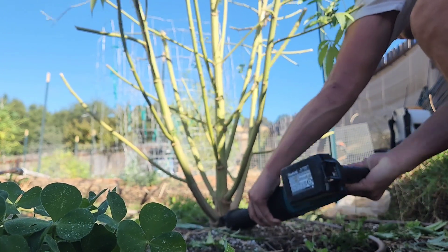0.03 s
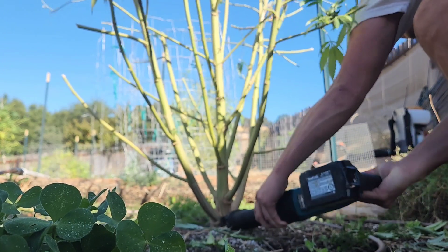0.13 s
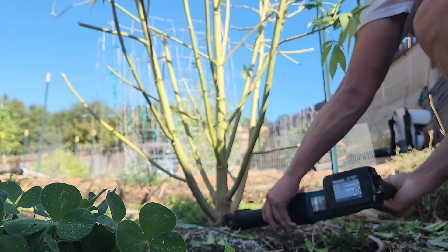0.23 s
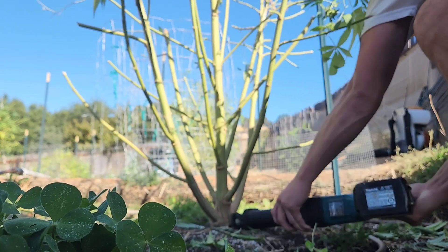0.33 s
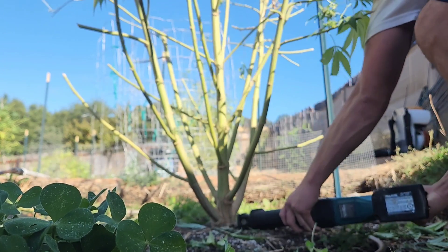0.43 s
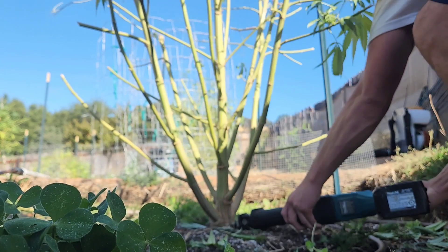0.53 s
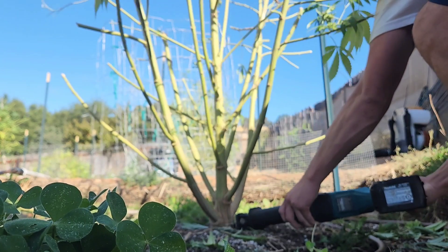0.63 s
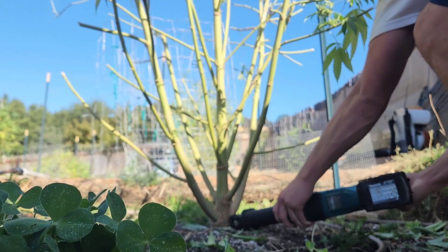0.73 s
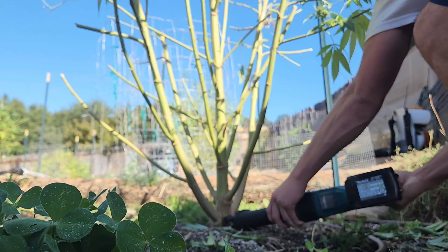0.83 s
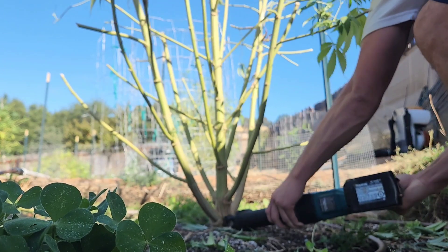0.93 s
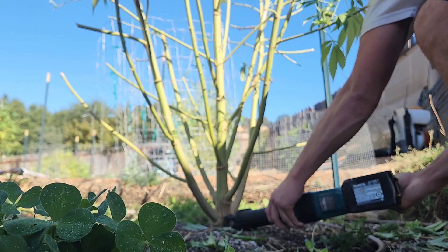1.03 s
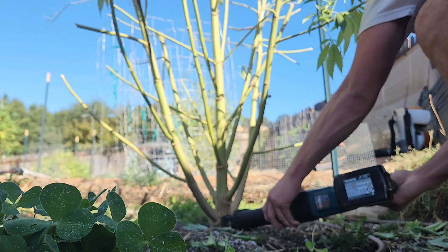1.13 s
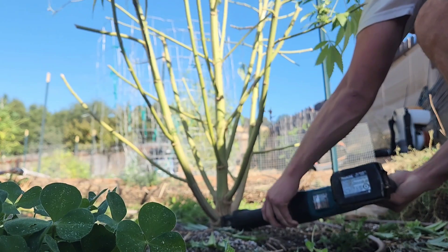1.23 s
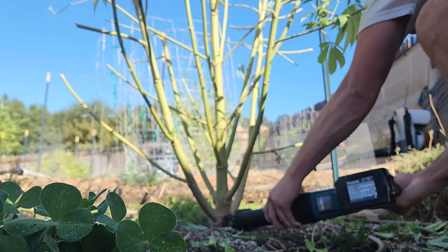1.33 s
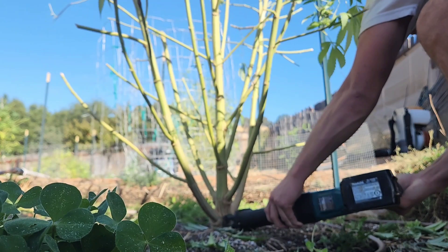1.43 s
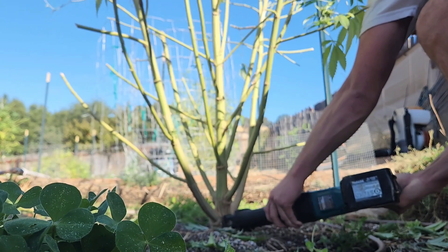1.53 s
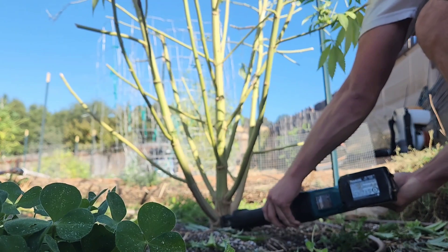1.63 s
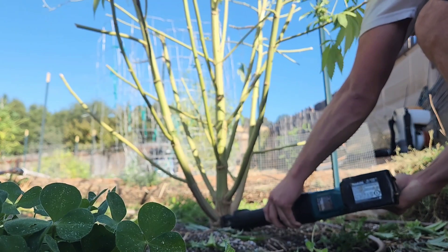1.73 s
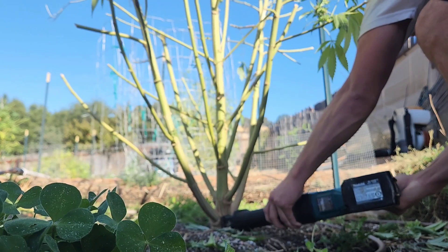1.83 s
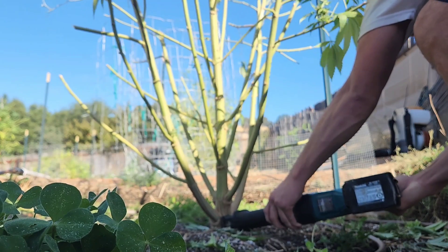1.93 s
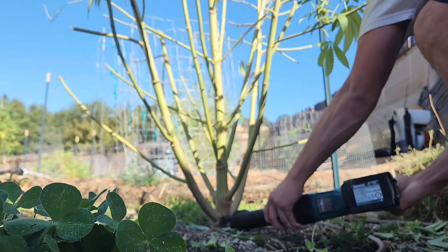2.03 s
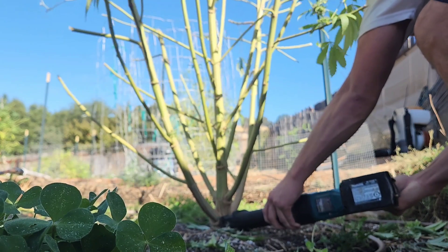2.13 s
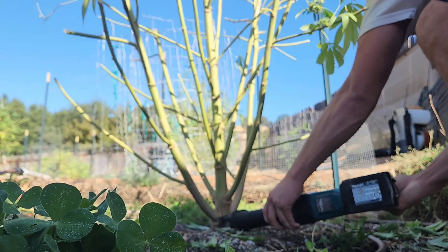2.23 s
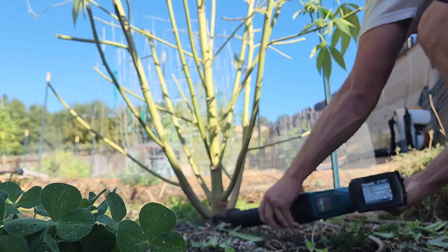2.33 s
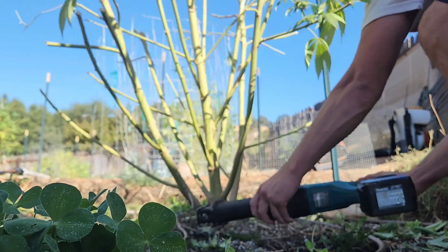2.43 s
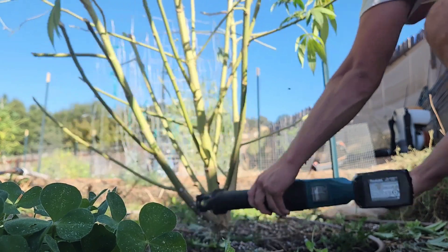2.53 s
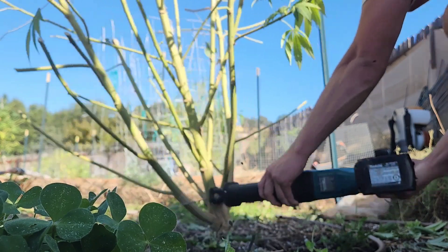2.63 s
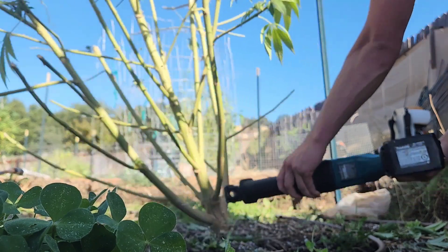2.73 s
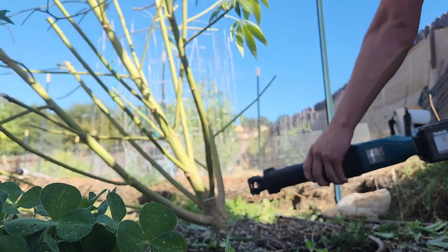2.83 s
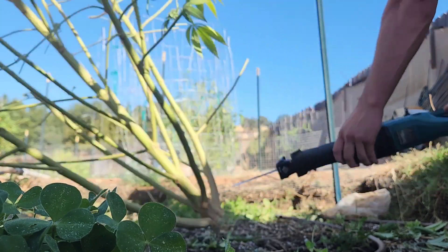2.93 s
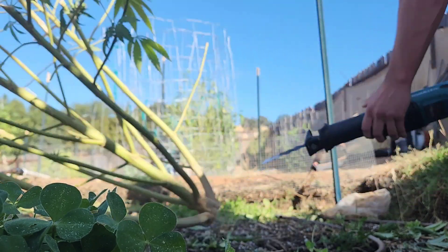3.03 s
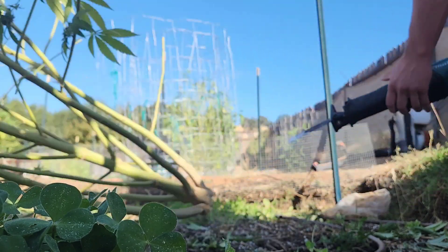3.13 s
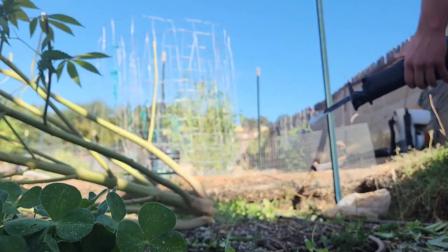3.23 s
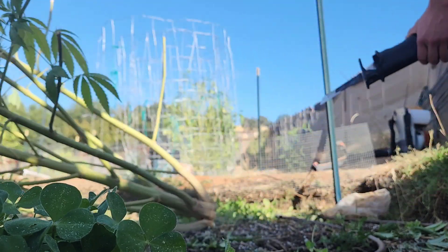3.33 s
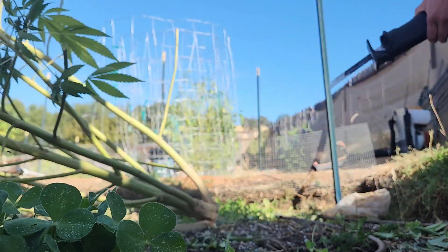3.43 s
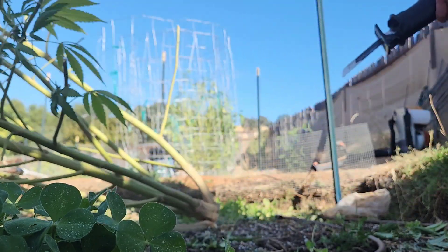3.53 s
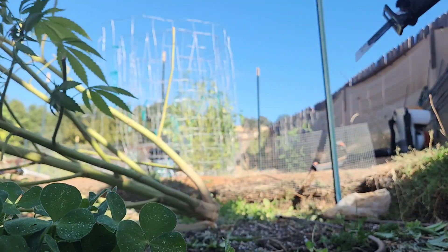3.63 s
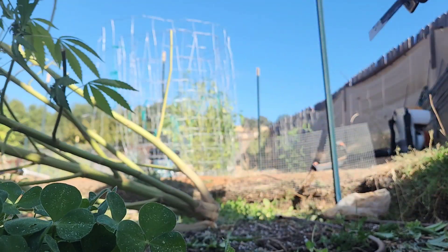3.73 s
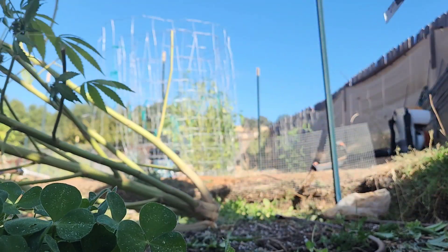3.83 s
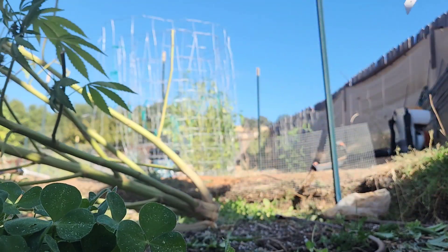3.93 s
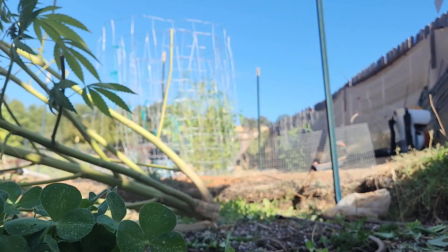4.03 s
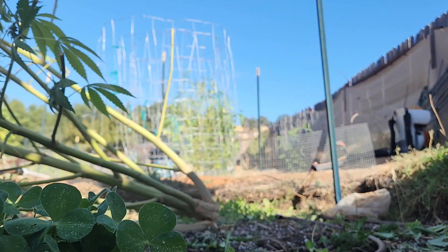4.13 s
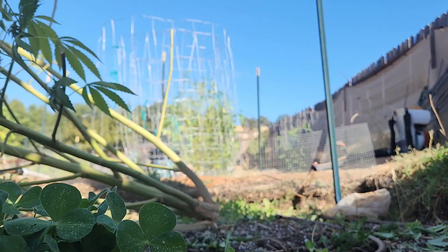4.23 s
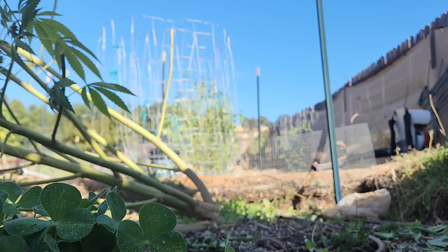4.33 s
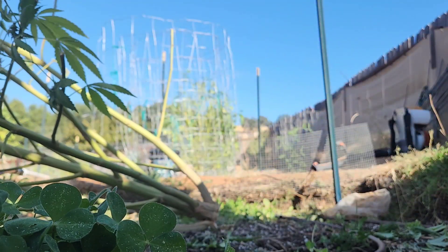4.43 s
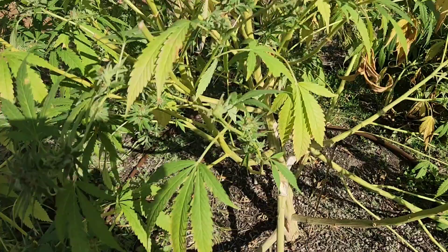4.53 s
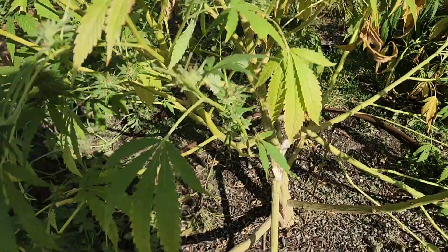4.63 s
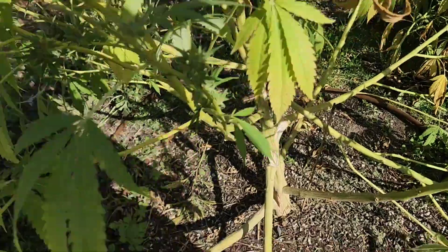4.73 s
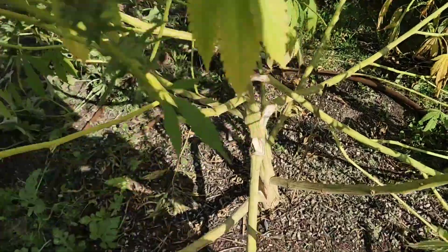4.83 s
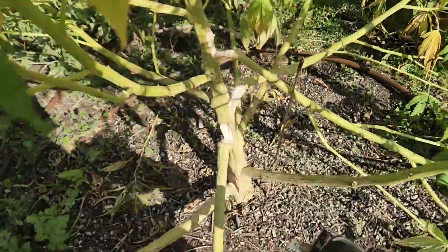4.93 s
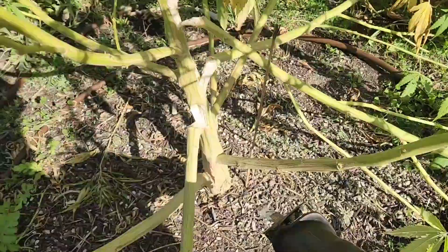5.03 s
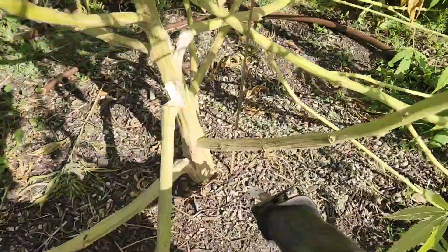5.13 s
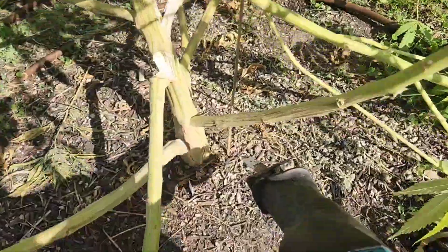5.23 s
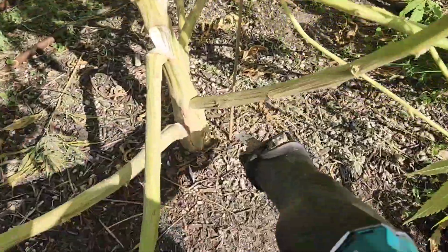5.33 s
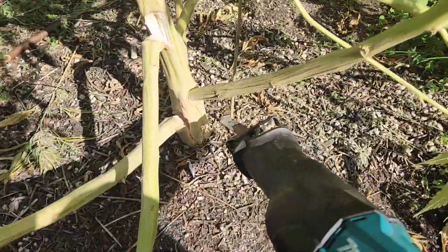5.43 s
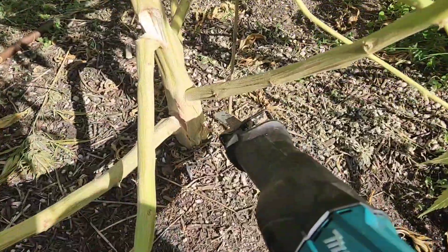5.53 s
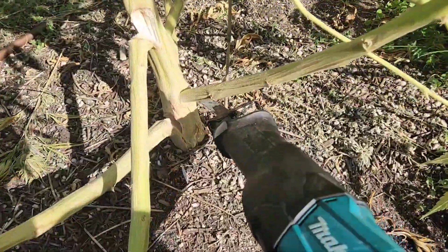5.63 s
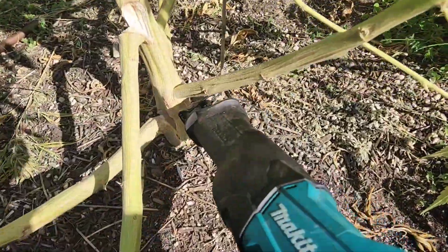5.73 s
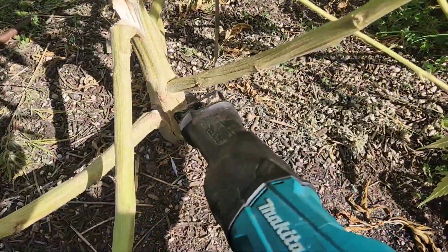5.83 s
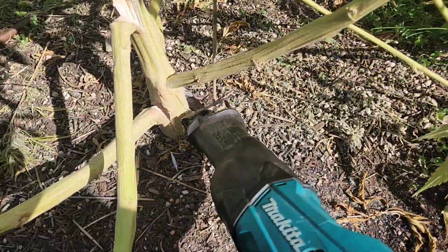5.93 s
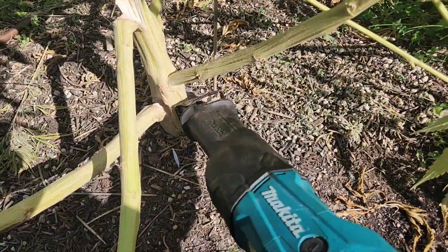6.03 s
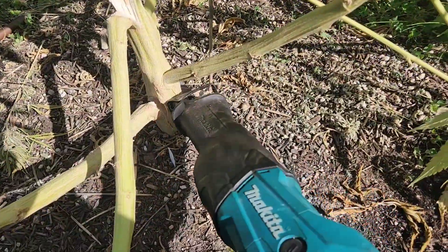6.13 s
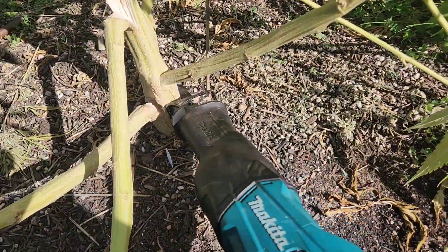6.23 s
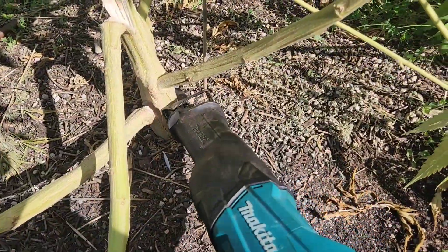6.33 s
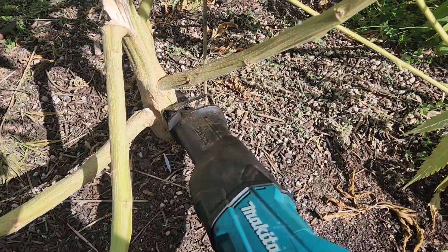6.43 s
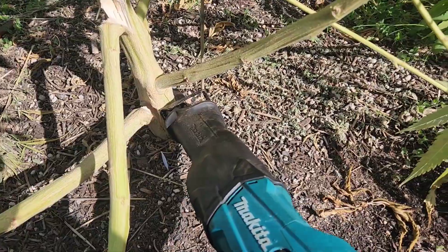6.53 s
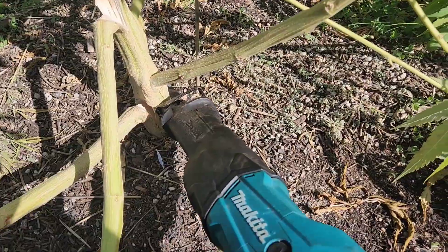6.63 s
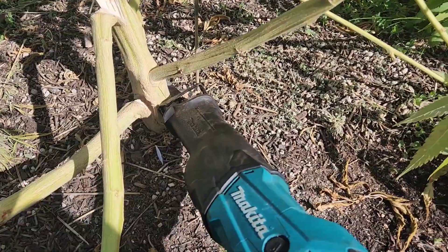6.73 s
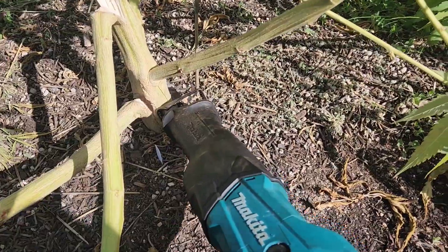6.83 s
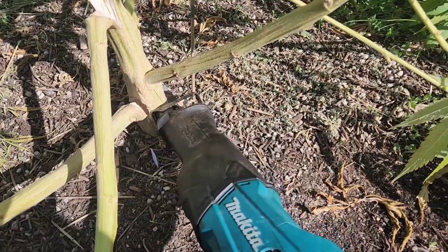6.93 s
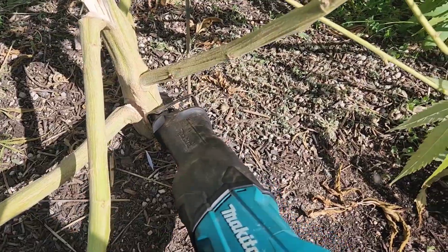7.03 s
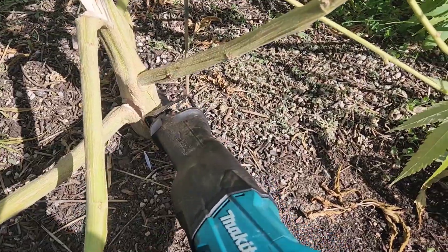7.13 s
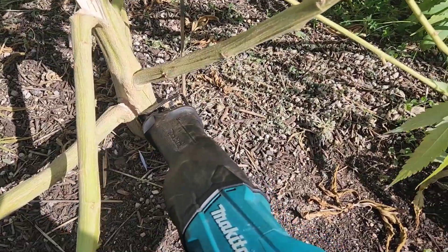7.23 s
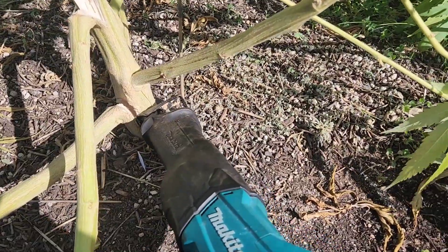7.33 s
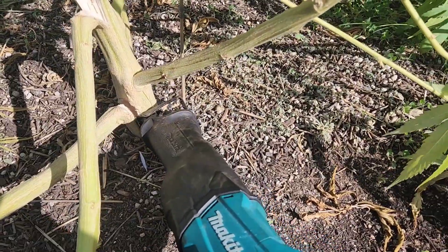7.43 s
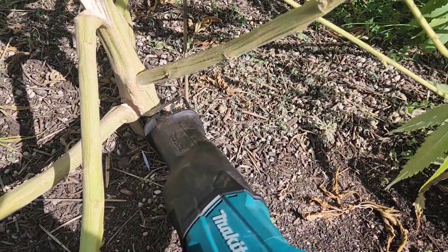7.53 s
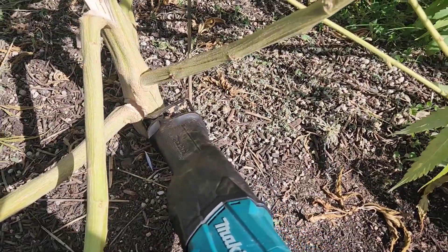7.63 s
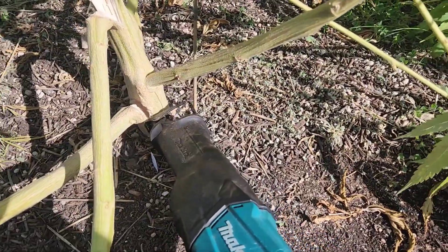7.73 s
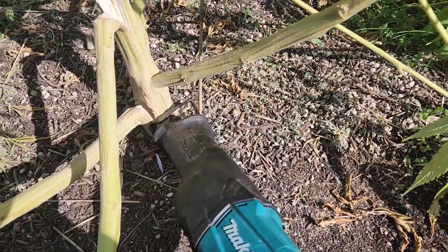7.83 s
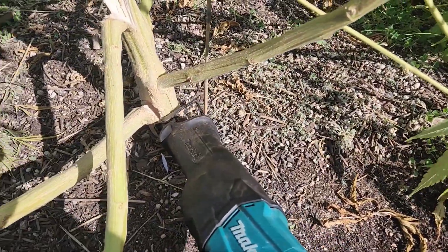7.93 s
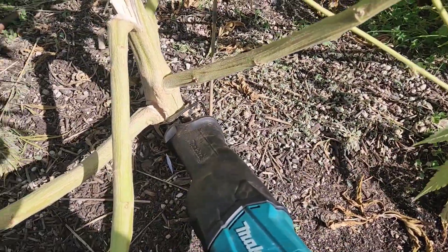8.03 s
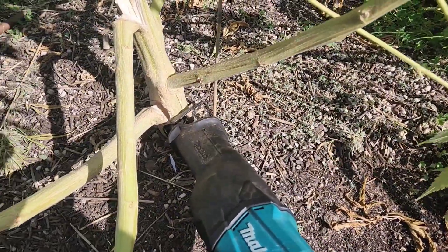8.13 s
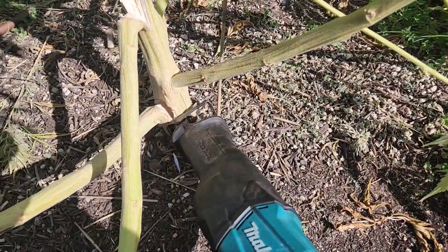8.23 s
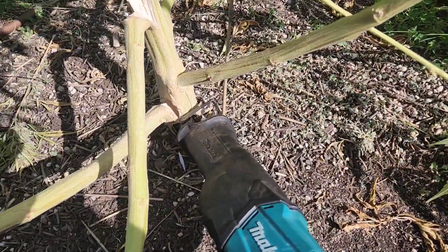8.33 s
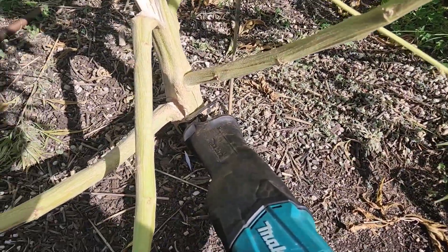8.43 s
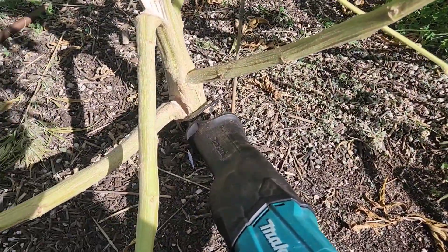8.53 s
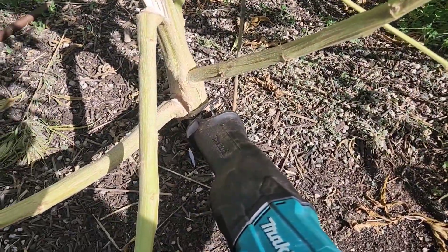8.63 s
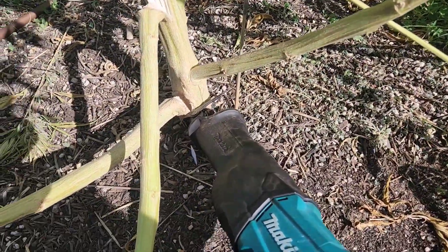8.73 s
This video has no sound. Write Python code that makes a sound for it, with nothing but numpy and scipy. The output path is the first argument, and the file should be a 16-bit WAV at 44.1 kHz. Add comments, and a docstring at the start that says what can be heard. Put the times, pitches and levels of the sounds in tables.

```python
"""A cordless reciprocating saw, already running, cuts a thick green stalk a step away and winds down.
Crank blows at both stroke ends, gear whirr, rasping tooth noise and a slow shake all follow its strokes.
Then stems snap as noisy knocks, leaf tips fizz as the crown sweeps down, and the plant settles.
Leaves rustle, stems rub and wood is tapped as filtered noise, with soft jolts, while things are handled.
Last the saw spins up close by and bites into the stump; garden air and a light breeze lie under it all."""
import sys
import numpy as np
from scipy import signal
from scipy.fft import rfft, irfft, next_fast_len
from scipy.io import wavfile
from scipy.ndimage import uniform_filter1d, map_coordinates

SR = 44100
rng = np.random.default_rng(int(sys.argv[2]) if len(sys.argv) > 2 else 0)


def bounce(signal):
    """Save signal as a 16-bit WAV file at the path given by the first command-line argument."""
    frames = np.transpose(np.atleast_2d(signal))
    limited = np.clip(frames, -1, 1)
    pcm = np.round(limited * 32767).astype(np.int16)
    wavfile.write(sys.argv[1], SR, pcm)


N = 387198


def amp(db):
    """Decibels to gain."""
    return 10 ** (np.asarray(db) / 20)


def unit(x):
    """Scale to rms 1."""
    return x / np.sqrt(np.mean(x ** 2) + 1e-20)


def clock():
    """The time of each sample, in seconds."""
    return np.arange(N) / SR


def along(points, hz):
    """Read (freq_hz, value) points on a log frequency axis."""
    f, v = np.transpose(points)
    return np.interp(np.log(hz + 1), np.log(f + 1), v)


def curves(rows):
    """One value per sample for each column after the time."""
    s, *cols = np.transpose(rows)
    return [np.interp(clock(), s, c) for c in cols]


def wobble(rate):
    """A smooth random curve, rate knots a second."""
    knots = rng.standard_normal(int(N * rate / SR) + 4)
    return map_coordinates(knots, [clock() * rate], order=2)


def noise():
    """Two unrelated white noises."""
    return rng.standard_normal((2, N))


def grains(rate, spread_db):
    """Two unrelated trains of tiny fractures of uneven size, rate a second."""
    struck = rng.random((2, N)) < rate / SR
    return unit(noise() * struck * amp(spread_db * noise()))


def filtered(x, response):
    """Multiply the spectrum of x by a complex response of frequency."""
    size = 2 * next_fast_len(N // 2 + 8192)
    return irfft(rfft(x, size) * response(np.fft.rfftfreq(size, 1 / SR)), size)[..., :N]


def coloured(x, spectrum):
    """Colour x with a causal minimum-phase filter, at rms 1."""
    def response(hz):
        cepstrum = irfft(np.log(amp(along(spectrum, hz)) + 1e-6))
        return np.exp(rfft(2 * cepstrum[:len(hz) - 1], len(cepstrum)))
    return unit(filtered(x, response))


def ringing(x, modes):
    """Excite parallel second-order resonances of alternating sign, at rms 1."""
    def response(f):
        total = 0
        for k, (centre, width, db) in enumerate(modes):
            resonance = 1j * f * width / (centre * centre - f * f + 1j * f * width)
            total = total + (-1) ** k * amp(db) * resonance
        return total
    return unit(filtered(x, response))


def placed(pair, alike, pan, lag=0):
    """Mix two unrelated signals to left and right; the left lags by some samples."""
    def weights(hz):
        turn = np.arccos(np.clip(along(alike, hz), -1, 1)) / 2
        return np.array([np.cos(turn), np.sin(turn)])
    mid, side = filtered(pair, weights)
    ears = np.array([[.5], [-.5]])

    def lean(hz):
        return amp(ears * along(pan, hz)) * np.exp(-2j * np.pi * ears * lag * hz / SR)
    return filtered(np.array([mid + side, mid - side]), lean)


def swells(rows, rise, fall):
    """Rise, hold and fall (dB a second) for (start, length, dB, ..) rows: one gain curve per dB column."""
    start, length, *levels = np.transpose(rows)[:, :, None]
    t = clock()[::64]
    shape_db = -rise * np.maximum(start - t, 0) - fall * np.maximum(t - start - length, 0)
    return [np.interp(clock(), t, np.linalg.norm(amp(db + shape_db), axis=0)) for db in levels]


def bursts(hits, t60, spectrum):
    """Coloured noise bursts from (start_s, level_db) rows, each losing 60 dB in t60 seconds."""
    level, t = np.zeros(N + SR), np.arange(SR // 8) / SR
    for start, db in hits:
        level[round(start * SR):][:len(t)] += amp(db - 60 * t / t60)
    level = level[:N]
    return coloured(noise() * level, spectrum) * np.sqrt(np.mean(level ** 2))


# crank speed: time_s, strokes_per_s
FAR_SPEED = [(0, 24.3), (0.12, 23.95), (0.3, 24.1), (0.55, 22.2), (0.75, 25.49), (0.9, 26.55), (1.1, 28.0),
             (1.35, 27.46), (1.6, 29.2), (1.8, 28.8), (2, 29.11), (2.2, 29.33), (2.4, 29.38), (2.7, 31.0)]
# trigger: pulled_s, released_s
FAR_TRIGGER = (-0.1, 2.596)
# seat in the cut: time_s, feed_db (against its mean), shake_db (before trim), slide_slam_db, blade_ring_db
FAR_FEED = [(0.04, -26, -25.5, 1.5, 0), (0.28, -27, -32.5, -1.5, 4.5), (0.45, -28, -30, -3, -0.5),
            (0.67, -30.5, -37, -1.5, 6.5), (0.88, -28.5, -30, -1.5, 5.5), (0.97, -28.5, -37.5, 0.5, -4),
            (2.38, -29, -30, -1.5, -7), (2.42, -26.5, -41, -8, -4.5), (2.44, -29.5, -27.5, -1, -1.5),
            (2.5, -28, -44.5, -1.5, 3.5), (2.58, -28, -44, -4.5, 6)]
# drive train load, slack once the stalk parts: time_s, gear_db, motor_whine_db
FAR_LOAD = [(.15, -1, 3.5), (.45, -2.5, -1), (.68, 2.5, 4.5), (.95, 0, 0), (1.6, 0.5, -1.5),
            (2.36, -1.5, -3.5), (2.44, -8.5, -2.5)]
# one row each for boom, pull knock, push knock, rasp, zing, blade ring, gear, motor whine:
# base_db, db_per_feed_db, db_per_extra_stroke_per_s, db_per_slam_db, db_per_ring_db
FAR_MIX = [(-33.5, 1.7, 0.14, 0.93, 0), (-26.5, 0, 0.25, 0.37, 0), (-30, 1.08, -0.12, 0.57, 0),
           (-23.5, 1, 0.38, 0, 0), (-36.5, -2, 2.5, 2, 0), (-41, 1.5, -0.5, -0.5, 1),
           (-30, 0.6, 0.8, 0.5, 0), (-34.5, .7, -0.7, 1.1, 0.27)]
# tool shake: multiple_of_stroke_rate, relative_level_db
FAR_SHAKE = [(1, -9), (2, 0), (3, -4), (4, -13), (5, -20)]
# hollow boom of the casing: freq_hz, relative_level_db
FAR_BOOM = [(76, -33.5), (130, -5.5), (172, -11), (263, -7.5), (301, -2), (350, 1.5), (430, -7.5),
            (560, -25), (950, -120)]
# knocking housing: freq_hz, relative_level_db
FAR_BODY = [(250, -33), (430, -3.5), (560, 3), (640, 1.5), (790, 3), (1020, -3.5), (1280, -6.5),
            (1530, -8.5), (1700, -19), (2200, -15.5), (3400, -15), (4300, -21), (6000, -27), (9000, -50)]
# blow at the far end of the stroke: freq_hz, relative_level_db
FAR_PUSH = [(200, -17), (340, -11.5), (450, -4), (570, 5.5), (720, -2), (950, -11), (1350, -8), (1700, -23),
            (4400, -44)]
# rasping teeth: freq_hz, relative_level_db
FAR_TEETH = [(880, -28), (1500, -7.5), (1780, -10.5), (2190, -5), (2690, -4.5), (3840, -3.5), (4220, -5.5),
             (4550, -3), (4900, -2), (5770, -6.5), (6240, -3), (7240, -1.5), (8240, -7), (9280, -16),
             (15100, -15), (16000, -36.5)]
# gear mesh (first row, levelled apart), then motor whine: multiple_of_stroke_rate, level_db, flutter_hz
FAR_GEAR = [(45.1, 0, 34), (88, -8, 30), (92.5, 1, 14), (128, 3, 18), (151, -11, 50), (181, -4, 40),
            (195, 2, 20), (286, -6, 60)]
# stereo likeness: freq_hz, left_right_likeness (0 to 1)
FAR_ALIKE = [(60, 0.5), (180, 1), (550, 1), (1650, 1), (4970, 0.23), (15000, 0.34)]
# stereo balance: freq_hz, left_over_right_db
FAR_PAN = [(60, -4.5), (130, 1.5), (290, 0.5), (640, 0.5), (1410, 9), (3100, -2.5), (6820, 1.5),
           (15000, 1.5)]


def far_cut():
    """The saw works through the foot of the plant, its sound tied to the crank, and runs down."""
    turns = crank(FAR_SPEED, .39)
    levels = drive(FAR_TRIGGER, FAR_SPEED, FAR_FEED, FAR_LOAD, FAR_MIX)
    pair, sway = saw(turns, levels, FAR_SHAKE, FAR_BOOM, FAR_BODY, FAR_PUSH, FAR_TEETH, FAR_GEAR,
                     looseness=.85, pull_at=.025, push_at=.545, mesh_at=.69, mesh_db=8,
                     strain_at=.3, ripple=.018, bite_db=2.5, tick=.1)
    return placed(pair, FAR_ALIKE, FAR_PAN, lag=4.64) + amp(1.5) * sway


# crank speed: time_s, strokes_per_s
NEAR_SPEED = [(7.04, 25.74), (7.2, 29.2), (7.35, 33.0), (7.5, 34.25), (7.58, 34.15), (7.7, 32.55),
              (7.85, 31.35), (8, 30.7), (8.2, 30.47), (8.5, 29.76), (8.78, 29.36)]
# trigger: pulled_s, released_s
NEAR_TRIGGER = (7.03, 8.8)
# seat in the cut: time_s, feed_db (against its mean), shake_db (before trim), slide_slam_db, blade_ring_db
NEAR_FEED = [(7.1, -19.5, -37.5, -2.5, -5), (7.155, -15, -32.5, -6, 7), (7.22, -15.5, -37, -4.5, -14),
             (7.374, -17, -31, -3.5, -7.5), (7.402, -17, -36.5, 0, -14), (7.68, -16.5, -31, -1.5, -9.5),
             (7.946, -17, -27, -1, -0.5), (8.358, -17, -24, 1, -2.5), (8.74, -17.5, -22.5, 1.5, -2)]
# drive train load: time_s, gear_db, motor_whine_db
NEAR_LOAD = [(7.15, 1, 1), (7.5, -.5, 1), (7.9, -1, 0.5), (8.7, -1.5, 1)]
# one row each for boom, pull knock, push knock, rasp, zing, blade ring, gear, motor whine:
# base_db, db_per_feed_db, db_per_extra_stroke_per_s, db_per_slam_db, db_per_ring_db
NEAR_MIX = [(-38, -0.00034, 0.25, 0.55, 0), (-27, 0.5, 0.14, 0.35, 0.093), (-29, 0, -.5, 0.84, 0.074),
            (-16, 1, -0.11, 0, 0.03), (-23, .9, 1, 0.035, 0), (-25, 0.32, -0.4, 0, 0.9),
            (-31, .3, .6, 0.22, 0), (-31, 0, 0.9, 0.3, 0.083)]
# tool shake: multiple_of_stroke_rate, relative_level_db
NEAR_SHAKE = [(1, -9), (2, 1), (3, -6.5), (4, -5), (5, -11)]
# hollow boom of the casing: freq_hz, relative_level_db
NEAR_BOOM = [(76, -28.5), (130, -9), (177, -10), (210, -4.5), (242, -8.5), (343, -3), (430, -12.5),
             (560, -52), (950, -120)]
# knocking housing: freq_hz, relative_level_db
NEAR_BODY = [(250, -42), (430, -19.5), (539, -1.5), (645, -4), (808, 3.5), (955, -7), (1130, -9),
             (1390, -5), (1800, -21), (2000, -4.5), (2600, -26), (4400, -120)]
# blow at the far end of the stroke: freq_hz, relative_level_db
NEAR_PUSH = [(300, -23.5), (550, 0.5), (700, -1.5), (900, 2), (1150, -0.5), (1400, -1), (1750, -10),
             (2100, -5.5), (2600, -16.5), (4400, -25.5)]
# rasping teeth: freq_hz, relative_level_db
NEAR_TEETH = [(880, -23.5), (1500, -5.5), (1810, -9.5), (2140, -1), (2460, -7.5), (2770, -3), (3770, -8),
              (5660, -3.5), (6760, -1.5), (7760, -4), (8660, -18.5), (10900, -13.5), (12200, -19.5),
              (15100, -12.5), (16000, -29)]
# gear mesh (first row, levelled apart), then motor whine: multiple_of_stroke_rate, level_db, flutter_hz
NEAR_GEAR = [(44.5, 2, 14), (66, -7, 40), (87, 5, 13), (150, 6.5, 12), (195, 4, 30), (387, -8.5, 110),
             (456, -9.5, 90)]
# stereo likeness: freq_hz, left_right_likeness (0 to 1)
NEAR_ALIKE = [(60, 0.72), (180, 0.81), (550, 0.81), (1650, 0.41), (4970, 0.018), (15000, 0.031)]
# stereo balance: freq_hz, left_over_right_db
NEAR_PAN = [(60, -22), (130, -4), (290, 1.5), (640, 3), (1410, 1.5), (3100, -0.5), (6820, -0.5),
            (15000, -2.5)]


def near_cut():
    """The saw spins up and bites into the stump close by, its sound tied to the crank."""
    turns = crank(NEAR_SPEED, .12)
    levels = drive(NEAR_TRIGGER, NEAR_SPEED, NEAR_FEED, NEAR_LOAD, NEAR_MIX)
    pair, sway = saw(turns, levels, NEAR_SHAKE, NEAR_BOOM, NEAR_BODY, NEAR_PUSH, NEAR_TEETH, NEAR_GEAR,
                     looseness=1.0, pull_at=-.04, push_at=.46, mesh_at=.65, mesh_db=5.5,
                     strain_at=.8, ripple=.004, bite_db=5, tick=.08)
    # the blade drifts from left to right as it sinks in
    drift_db = np.interp(clock(), [7.2, 8.7], [1.3, -1.4])
    cut = placed(pair, NEAR_ALIKE, NEAR_PAN, lag=-0.824)
    return cut * amp([drift_db / 2, -drift_db / 2]) + amp(-0.5) * sway


# rebounds of the slide after the pull blow: delay_ms, gain, delay_scatter_ms
PULL_BOUNCES = [(0, 1, .12), (3.4, .7, .5), (8, .4, 1.2)]
# rebounds after the push blow: delay_ms, gain, delay_scatter_ms
PUSH_BOUNCES = [(0, 1, .15), (1.8, .5, .4), (3.7, .25, .6)]
# single lurch that drives the casing boom: delay_ms, gain, delay_scatter_ms
BOOM_BOUNCES = [(0, 1, .3)]
# high resonances of the thin blade: freq_hz, width_hz, level_db
ZING = [(2724, 190, -8), (3880, 68, -11), (6270, 140, -2), (6770, 84, 1.5), (7100, 120, -0.5),
        (7750, 260, -2.5), (11820, 300, -8.5), (12900, 300, -10.5)]
# resonances of blade and shoe: freq_hz, width_hz, level_db
BLADE = [(2155, 115, 18), (2680, 130, 12)]
# casing resonances that the whine sweeps through: freq_hz, width_hz, level_db
CASE = [(1414, 840, 2.5), (2240, 190, 6.5), (2730, 130, 2), (3116, 200, 1), (3785, 220, 7.5),
        (4740, 300, 1.5), (5060, 380, 2), (6660, 1800, 0.5), (13100, 2600, 6)]


def saw(turns, levels, shake, boom, body, push_body, teeth, gear, looseness, pull_at, push_at,
        mesh_at, mesh_db, strain_at, ripple, bite_db, tick):
    """All the sounds of the tool, locked to its crank: (unrelated pair, shaking)."""
    shaking, booming, pulling, pushing, rasping, zinging, singing, meshing, whining = levels

    # the slide slams home at each end: a loose clatter on the pull, a compact knock on the push
    pull, pull_size, pull_age = reversal(turns, pull_at, PULL_BOUNCES, scatter_db=1.0)
    push, push_size, push_age = reversal(turns, push_at, PUSH_BOUNCES, scatter_db=1.2)
    lurch = reversal(turns, pull_at - .06, BOOM_BOUNCES, scatter_db=1.2)[0]
    pull_rattle = pull_size * amp(-60 * pull_age / .11)
    push_rattle = push_size * amp(-60 * push_age / .025)
    # blows feed only the first of the pair, so both ears share them
    pulls, pushes, lurches = [unit(blow) * [[1], [0]] for blow in (pull, push, lurch)]
    rattle = unit(noise() * (pull_rattle + 0.22))
    knocks = running(coloured(pulls + looseness * rattle, body), pulling)
    clack = pushes + .65 * unit(noise() * push_rattle)
    knocks += running(coloured(clack, push_body), pushing)
    hollow = lurches + 0.35 * pushes + 0.55 * rattle + .35 * noise()
    casing = running(coloured(hollow, boom), booming)

    # teeth bite as the pull begins and slacken toward the end of the stroke
    through = (turns - pull_at) % 1
    drag = amp(-bite_db * through ** 2 + 0.86 * wobble(70) + 0.46 * wobble(16)) + tick * pull_rattle ** 2
    scrape = drag * (noise() + .8 * grains(2500, spread_db=1)) + 0.08 * pulls
    rasp = running(echoed(coloured(scrape, teeth)), rasping)
    zing = running(ringing(noise() * drag, ZING), zinging)
    ring = running(ringing(noise() * drag ** 2 + 0.95 * pulls + .4 * pushes, BLADE), singing)

    # the motor surges and sags within each stroke; the main gear sings as it drives the blade out
    shaft = turns + ripple * np.sin(2 * np.pi * (turns - .35)) / (2 * np.pi)

    def tone(multiple, db, flutter_hz):
        phase = multiple * shaft + flutter_hz * np.cumsum(wobble(300)) / SR
        return amp(db + 1.5 * wobble(10.0)) * np.exp(2j * np.pi * phase)
    push_angle = 2 * np.pi * (turns - mesh_at)
    load = amp(mesh_db * (np.cos(push_angle) + .55 * np.cos(2 * push_angle)))
    strain = amp(3 * np.cos(2 * np.pi * (turns - strain_at)))
    mesh = load * tone(*gear[0])
    whine = strain * sum(tone(*row) for row in gear[1:])
    whirr = running(np.array([mesh.real, mesh.imag]), meshing)
    whirr += running(ringing(np.array([whine.real, whine.imag]), CASE), whining)

    # the whole tool sways at the stroke rate and its multiples
    sway = sum(amp(db + 1.4 * wobble(9.5)) * np.sin(2 * np.pi * k * turns)
               for k, (_, db) in enumerate(shake, 1))
    return knocks + casing + rasp + zing + ring + whirr, running(sway, shaking)


def crank(speed, start):
    """Strokes made so far: the running sum of the crank speed."""
    s, rate = np.transpose(speed)
    return start + np.cumsum(np.interp(clock(), s, rate) * (clock() >= s[0])) / SR


def reversal(turns, at, bounces, scatter_db):
    """One point of the stroke: the blow with its rebounds, the size of the latest blow and the time since."""
    hits = np.flatnonzero(np.diff(np.floor(turns - at)) > 0)
    sizes = amp(scatter_db * rng.standard_normal(len(hits)))
    blows = np.zeros(N + SR)
    for ms, gain, scatter_ms in bounces:
        late = np.round(rng.normal(ms, scatter_ms, len(hits)) * SR / 1000).astype(int)
        blows[hits + late] += gain * sizes
    latest = np.searchsorted(hits, np.arange(N), side="right") - 1
    age = np.abs(np.arange(N) - hits[latest]) / SR
    return blows[:N], sizes[latest] * (latest >= 0), age


SPIN_UP_S, RUN_DOWN_DB_PER_S = 0.054, 283
USUAL_SPEED = 29  # strokes a second


def drive(trigger, speed, feed, load, mix):
    """Gains of the shake and each mix row: the trigger gates them; speed, load and seat in the cut set them."""
    pulled, released = trigger
    spin_up = np.clip((clock() - pulled) / SPIN_UP_S, 0, 1) ** 2
    gate = spin_up * amp(-RUN_DOWN_DB_PER_S * np.maximum(clock() - released, 0))
    feed_db, shake_db, slam_db, ring_db = curves(feed)
    gear_db, whine_db = curves(load)
    harder = feed_db - np.mean(np.transpose(feed)[1])
    faster = curves(speed)[0] - USUAL_SPEED
    *cutting, gear, whine = [db + by_feed * harder + by_speed * faster + by_slam * slam_db + by_ring * ring_db
                             for db, by_feed, by_speed, by_slam, by_ring in mix]
    return [gate * amp(db) for db in (shake_db, *cutting, gear + gear_db, whine + whine_db)]


def running(x, level):
    """Give x the rms level that the curve asks for while the saw runs."""
    power = np.sum(level ** 2) * x.size / N
    return x * level / np.sqrt(np.sum((x * level) ** 2) / power + 1e-20)


# echoes off ground and tool body: mean_delay_ms, gain
ECHOES = [(1.7, .22), (2.9, -.2), (5.3, .22)]


def echoed(x):
    """Add the nearby reflections, whose comb shifts as the tool is rocked."""
    n = np.arange(N)
    out = x.copy()
    for ms, gain in ECHOES:
        drift = 1 + .05 * wobble(2)
        read = n - ms * SR / 1000 * drift
        out += gain * np.array([np.interp(read, n, side) for side in x])
    return out


# the blade snags and kicks the shoe against the stalk: start_s, level_db (before trim)
KICKS = [(0.953, -12), (1.118, -6.5), (1.262, -10), (1.371, -10.5), (1.685, -7.5), (1.929, -10),
         (2.098, -6.5), (2.234, -6), (2.336, -8), (2.445, -7), (8.28, -8)]


def kicks():
    """A snag gives one harder knock with a metallic edge, both short noise bursts."""
    knock = amp(-7.5) * bursts(KICKS, t60=0.024, spectrum=FAR_BODY)
    edge = amp(-12) * bursts(KICKS, t60=0.022, spectrum=FAR_TEETH)
    return placed(knock + edge, FAR_ALIKE, FAR_PAN, lag=3.2)


# snapping stems and taps on the saw: start_s, level_db (before trim), pitch_hz, crisp_db
SNAPS = [(2.718, -31.5, 586, -8), (2.785, -39.5, 1887, -14.5), (3.049, -41, 1300, -14),
         (3.092, -26.5, 347, -26.5), (3.103, -35.5, 900, -22), (3.157, -20.5, 824, 0),
         (3.19, -30, 1423, -15), (3.212, -27.5, 366, -19), (3.28, -38, 528, -17), (3.33, -31, 1300, -21.5),
         (3.338, -34, 1190, 4.5), (3.973, -30, 970, -50.5), (4.033, -33.5, 417, -37),
         (4.541, -44, 600, -21), (4.621, -32.5, 696, -24.5), (4.917, -34, 301, -16),
         (4.966, -24.5, 1500, -15.5), (5.445, -33.5, 433, -40), (5.689, -48, 358, -11.5),
         (5.724, -30, 880, -7), (5.777, -35.5, 266, -8), (5.883, -51, 490, -9), (5.935, -30, 1210, -19),
         (5.973, -31.5, 748, -13), (6.014, -42, 837, -17.5), (6.051, -47, 600, -6),
         (6.079, -43.5, 2360, 2.5), (6.436, -52, 738, -10), (6.659, -41.5, 641, -13),
         (6.689, -43, 802, -10.5), (6.805, -48.5, 2320, -8.5), (7.015, -41.5, 910, -7),
         (7.039, -23.5, 1950, -1)]
# colour of cracking wood: freq_hz, relative_level_db
WOOD = [(290, -52), (500, 1), (1180, 2.5), (1820, 1.5), (2620, 4.5), (3490, -1), (3810, 1), (4700, -3),
        (5310, 0), (7000, 0), (9100, -23), (15400, -120)]


def snaps():
    """Each snap is a knock at the pitch of its stem; the crisper it is, the more it cracks and splinters."""
    s, peak, pitch, crisp = np.transpose(SNAPS)
    knock, t = np.zeros(N + SR), np.arange(SR // 8) / SR
    for start, db, hz in zip(s, peak, pitch):
        stem = signal.butter(2, [hz / 1.4, hz * 1.4], "bandpass", fs=SR)
        body = unit(signal.lfilter(*stem, rng.standard_normal(len(t))))
        knock[round(start * SR):][:len(t)] += body * amp(db - 12.0 - 60 * t / 0.044)
    crack = bursts(zip(s, peak - 5.5 + 0.38 * crisp), t60=0.048, spectrum=WOOD)
    bright = [(2500, -34.5), (6000, -4.5), (8000, -3.0), (10000, -10.0), (16000, -7.0)]
    splinter = bursts(zip(s, peak + crisp - 1), t60=0.026, spectrum=bright)
    return knock[:N] + crack + splinter


# leaves and stems brush as the plant falls and is handled: start_s, length_s, leaves_db, stems_db
RUSTLES = [(2.69, 0.091, -63.5, -59.5), (3.11, 0.25, -52, -49), (3.76, 0.34, -70.5, -64.5),
           (4.57, 0.16, -72.5, -59.5), (4.75, 0.53, -47, -57), (5.23, 0.038, -42.5, -58),
           (5.36, .14, -61, -64.5), (5.52, .14, -54.5, -67), (5.74, 0.05, -52.5, -54),
           (5.84, 0.275, -59.5, -65), (6.28, 0.22, -62.5, -76), (6.7, 0.142, -56.5, -69.5)]
RUSTLE_RISE_DB_PER_S, RUSTLE_FALL_DB_PER_S = 210, 220
# the fallen crown comes to rest: start_s, leaves_db, loss_db_per_s (the leaf tips fade at this rate too)
SETTLE = (3.41, -54.5, 86)
# leaf tips fizz as the crown sweeps down: start_s, length_s, level_db
TOPPLE = (3.093, 0.27, -54.5)
# colour of leaves: freq_hz, relative_level_db
LEAVES = [(590, -20), (1000, -8), (1400, -2), (1890, -4.5), (2200, -6.5), (4900, -0.5), (6550, -1.5),
          (7440, -1), (10800, -14), (12500, -4.5), (15200, -8.5), (16000, -21)]
# colour of stems: freq_hz, relative_level_db
STEMS = [(76, -28.5), (130, 1), (591, -4.5), (824, -9.5), (938, -12.5), (1440, -17.5), (1890, -20),
         (2200, -6.5), (2860, -33), (4840, -120)]
# colour of leaf tips: freq_hz, relative_level_db
TIPS = [(4000, -25), (8000, -4.5), (10500, -1.5), (13000, -1.5), (15300, -5), (16000, -18)]


def foliage():
    """Leaves brush and crackle in uneven clumps while stems scrape over the mulch: noise plus grains."""
    leaves, stems = swells(RUSTLES, RUSTLE_RISE_DB_PER_S, RUSTLE_FALL_DB_PER_S)
    landed, settle_db, loss = SETTLE
    settling, = swells([(landed, 0, settle_db)], RUSTLE_RISE_DB_PER_S, loss)
    tips, = swells([TOPPLE], RUSTLE_RISE_DB_PER_S, loss)
    crackle = amp(1.2 * wobble(45)) * (noise() + .8 * grains(700, spread_db=3.2))
    crisp = coloured(patchy(crackle, 1.8), LEAVES)
    scraping = amp(2.5 * wobble(30)) * (noise() + grains(200, spread_db=3))
    dull = coloured(patchy(scraping, 4), STEMS)
    fizz = coloured(amp(1.5 * wobble(30)) * (noise() + .6 * grains(1500, spread_db=2)), TIPS)
    return fizz * tips + crisp * np.hypot(leaves, settling) + dull * np.hypot(stems, settling / 2)


def patchy(x, depth_db):
    """Let the colour change from one contact to the next by a smoothed random gain over pitch and time."""
    z = signal.stft(x, nperseg=512)[2]
    field = rng.standard_normal(z.shape[1:])
    field = uniform_filter1d(uniform_filter1d(field, size=4, axis=0), size=7, axis=1)
    return signal.istft(z * amp(depth_db * unit(field)), nperseg=512)[1][:, :N]


# stems rub with a faint pitch: start_s, length_s, pitch_hz, width_hz, level_db
RUBS = [(3.701, 0.17, 890, 90, -67.5), (3.742, 0.16, 3700, 396, -73.5), (4.043, .05, 350, 150, -60),
        (4.1, 0.27, 4150, 447, -72.5), (4.594, 0.071, 480, 300, -56.5), (4.702, 0.11, 600, 400, -53),
        (5.153, .14, 342, 80, -54), (5.776, 0.096, 1100, 500, -62.5), (5.998, .13, 650, 450, -65)]


def rubs():
    """Each rub is a soft swell of narrow noise at the pitch of its stem."""
    out = np.zeros((2, N + SR))
    for start, length, hz, width, db in RUBS:
        swell = signal.windows.tukey(round(length * SR))
        sound = signal.lfilter(*signal.iirpeak(hz, hz / width, SR), rng.standard_normal((2, SR)))
        out[:, round(start * SR):][:, :len(swell)] += amp(db) * unit(sound)[:, :len(swell)] * swell
    return out[:, :N]


# dull jolts of tool and trunk: start_s, level_db, pitch_hz, t60_s
THUDS = [(2.43, -11.5, 59, 0.083), (3.169, -41, 169.3, 0.2), (4.566, -27, 63.3, 0.15),
         (4.639, -25.5, 65, 0.067), (5.39, -40, 245, 0.082), (5.989, -49, 135, 0.28),
         (6.107, -38, 43.4, 0.46), (6.715, -37.5, 70, 0.2), (7.102, -21.5, 51.4, 1),
         (7.247, -21, 60.5, 0.15)]


def thuds():
    """Heavy, soft jolts: low sines with a 2 ms onset that die away."""
    out, t = np.zeros(N + SR), np.arange(SR // 2) / SR
    for s, db, hz, t60 in THUDS:
        swing = np.sin(2 * np.pi * hz * t) * (1 - np.exp(-t / 0.002))
        out[round(s * SR):][:len(t)] += amp(db - 60 * t / t60) * swing
    return out[:N]


# spells of low rumble from handling: start_s, length_s, level_db
BUMPS = [(3.16, 0.22, -44), (4.57, 0.044, -39.5), (4.72, 0.4, -45), (5.75, 0.06, -57), (6.01, 0.055, -47),
         (6.71, 0.03, -57)]
BUMP_RISE_DB_PER_S, BUMP_FALL_DB_PER_S = 500, 97
# colour of the rumble: freq_hz, relative_level_db
RUMBLE = [(11, -32.5), (18, 2), (38, 10), (59, 10), (89, 5), (135, -11), (172, -20), (250, -22.5),
          (320, -50.5), (550, -120)]
# breeze on the microphone, weaker once it has moved in over the stump
BREEZE_DB, SHELTER_DB, MOVE_S = -54, -10, 4.55


def rumble():
    """A light breeze on the microphone and the low bumps of handling share one low noise."""
    breeze = amp(BREEZE_DB + SHELTER_DB * (clock() > MOVE_S) + 1.5 * wobble(8))
    bumps, = swells(BUMPS, BUMP_RISE_DB_PER_S, BUMP_FALL_DB_PER_S)
    return np.hypot(breeze, bumps) * coloured(noise()[0], RUMBLE)


# colour of the garden air: freq_hz, relative_level_db
AIR = [(59, -28), (100, -0.5), (197, -17.5), (492, -15.5), (1580, -24.5), (2130, -17), (2580, -25.5),
       (4110, -25.5), (4870, -29), (6290, -24.5), (7450, -13.5), (9410, -43.5), (12100, -28.5),
       (15000, -37), (16000, -24)]


def air():
    """Quiet garden air: steady coloured noise."""
    return amp(-64) * coloured(noise(), AIR)


def scene():
    """Two cuts, the plant and the handling between them, over quiet garden air."""
    # the plant falls to the left: the garden layer leans that way until the microphone moves in
    left_db = 4.5 * (clock() < MOVE_S)
    sounds = foliage() + rubs() + snaps() + air()
    alike = [(200, 0.74), (1000, 0.42), (3000, 0.064), (10000, 0.098)]
    garden = placed(sounds, alike, pan=[(200, -0.21), (8000, -.2)])
    garden = garden * amp([left_db / 2, -left_db / 2])
    return far_cut() + near_cut() + kicks() + garden + rumble() + thuds()


TOP_HZ = 16000


def record(dry):
    """The microphone rounds off the highest peaks and limits the band."""
    rounded = dry / (1 + np.abs(dry / .95) ** 6) ** (1 / 6)
    return filtered(rounded, lambda hz: hz < TOP_HZ)


dry = scene()
out = record(dry)
bounce(out)
```